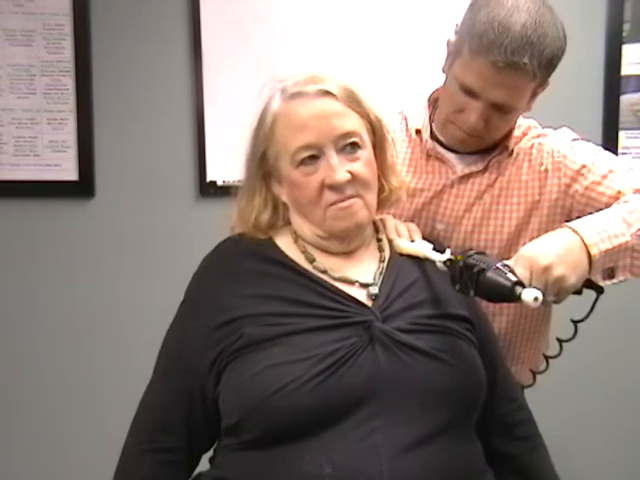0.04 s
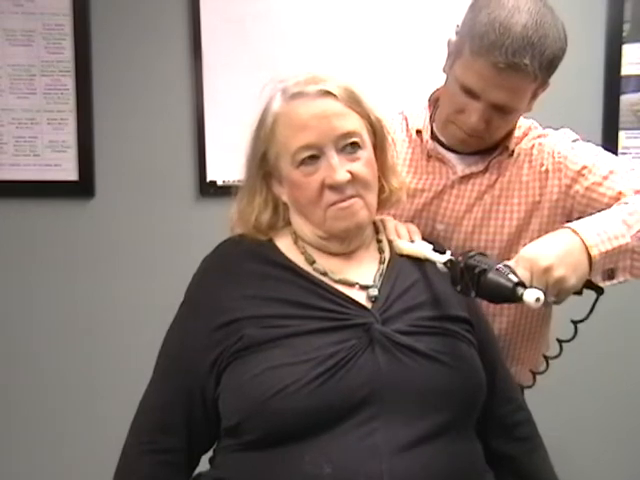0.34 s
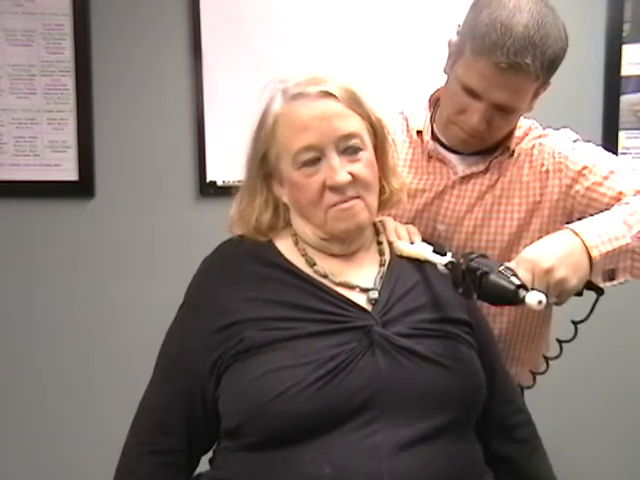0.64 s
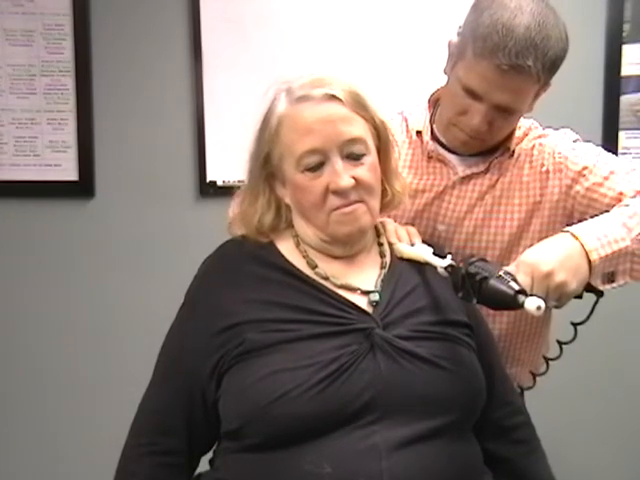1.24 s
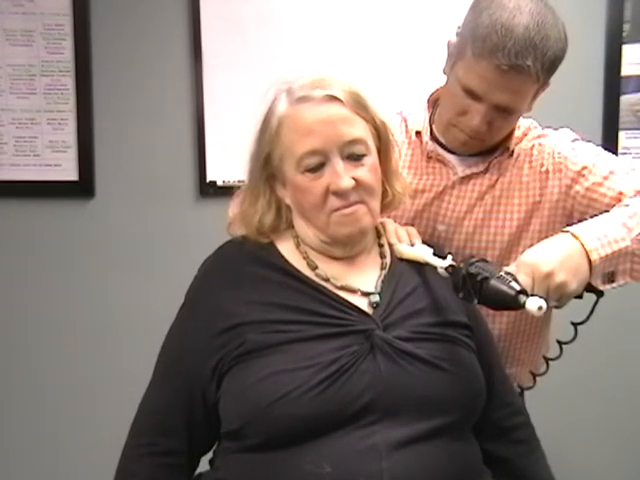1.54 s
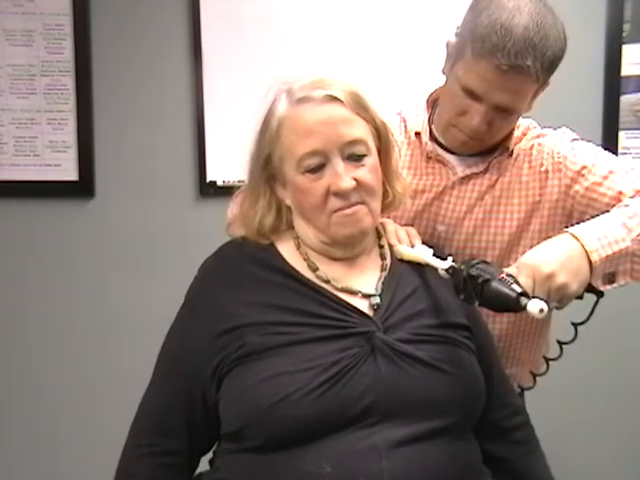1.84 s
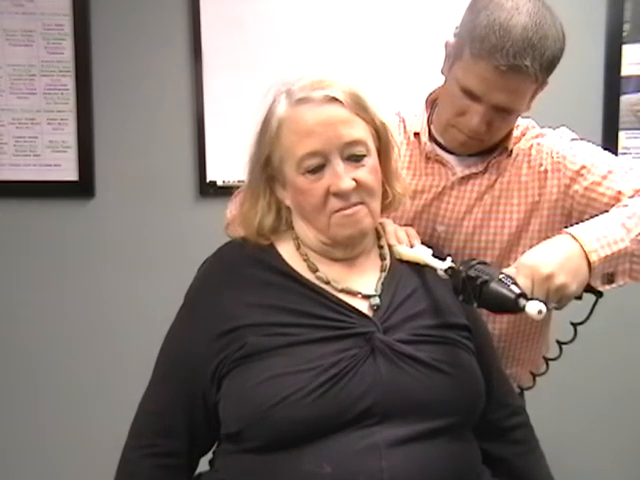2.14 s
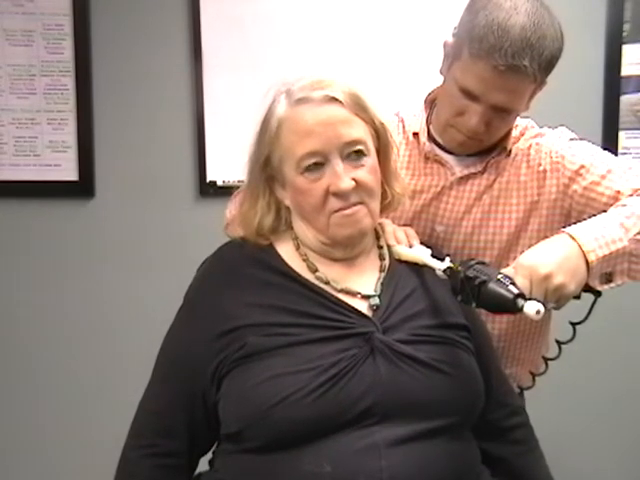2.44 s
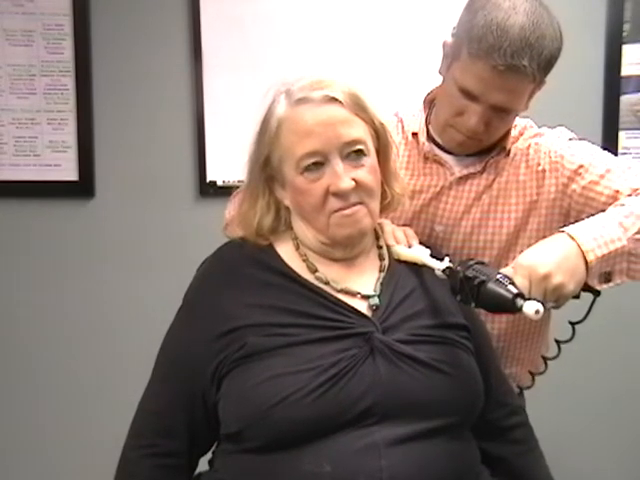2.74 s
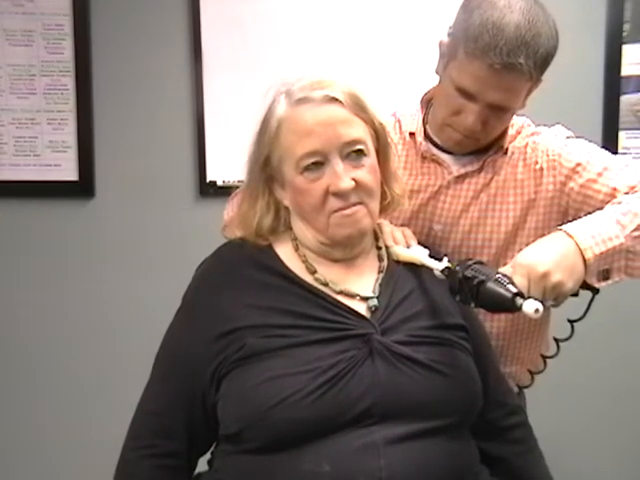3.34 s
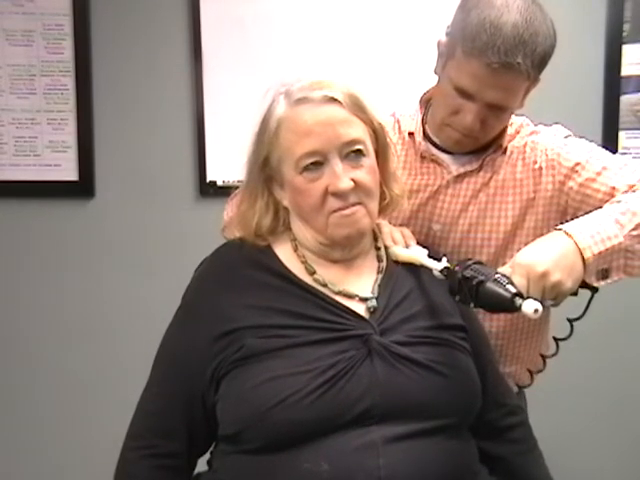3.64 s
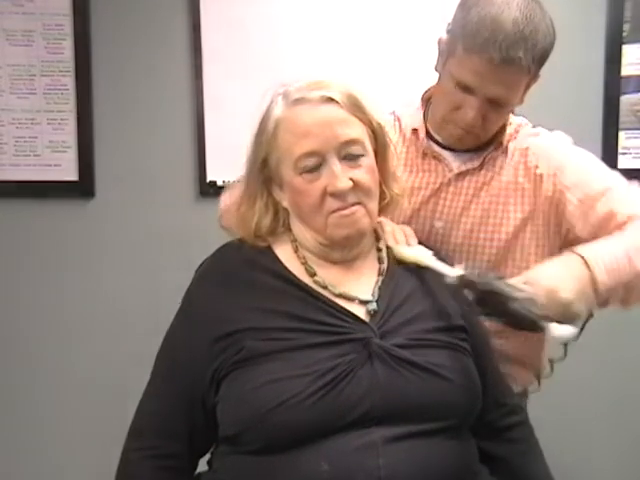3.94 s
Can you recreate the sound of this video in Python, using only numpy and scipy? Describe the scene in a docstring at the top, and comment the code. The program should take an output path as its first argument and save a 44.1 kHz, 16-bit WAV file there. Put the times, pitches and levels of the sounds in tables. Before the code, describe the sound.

A handheld adjusting tool taps rapidly against a shoulder, then stops in a quiet office.

```python
"""Rapid tapping, twelve blows a second: a handheld spring-tipped adjusting tool on a shoulder.
In each stroke the plunger slides, catches with a tick and strikes: a bright snap, a hollow knock of
the housing, a soft thud in the shoulder and a ping. The blows grow firmer; a small office answers
each one, over low ventilation hum. A heavier knock ends the run; cloth rustles as the tool lifts."""
import sys
import numpy as np
from scipy import signal
from scipy.fft import rfft, irfft
from scipy.io import wavfile

SR = 44100
rng = np.random.default_rng(int(sys.argv[2]) if len(sys.argv) > 2 else 0)


def waveform_to_disk(signal):
    """Save audio, clipped to [-1, 1], as 16-bit WAV at the path in sys.argv[1]."""
    frames = np.transpose(np.atleast_2d(signal))
    scaled = np.clip(frames, -1, 1) * 32767
    samples = np.round(scaled).astype(np.int16)
    wavfile.write(sys.argv[1], SR, samples)


N = 176400

FIRST_S, PERIOD_S, STROKES = -.01875, .083289, 45
KNOCK_WET_DB = -1


def amp(db):
    """Decibels to gain."""
    return 10 ** (np.asarray(db) / 20)


def unit(x):
    """Scales to unit energy."""
    return x / np.sqrt(np.sum(x ** 2) + 1e-20)


def read(points, hz):
    """Interpolates a table on a log-frequency axis."""
    f, value = np.transpose(points)
    return np.interp(np.log(hz + 1), np.log(f), value)


def add(mix, start_s, sound):
    """Adds a sound into a track, cropped to fit."""
    at = int(round(start_s * SR))
    sound = sound[max(-at, 0):]
    part = mix[max(at, 0):][:len(sound)]
    part += sound[:len(part)]


def shaped(x, spectrum):
    """Zero-phase filter with the given spectrum."""
    return irfft(rfft(x) * amp(read(spectrum, np.fft.rfftfreq(len(x), 1 / SR))), len(x))


def even(x):
    """Flattens a noise's spectrum; unit energy."""
    z = rfft(x)
    return unit(irfft(z / (abs(z) + 1e-12), len(x)))


def colour(spectrum, size=4096):
    """Minimum-phase impulse response of a spectrum; unit energy."""
    log_gain = np.log(amp(read(spectrum, abs(np.fft.fftfreq(size, 1 / SR)))))
    response = np.exp(np.conj(signal.hilbert(log_gain)))
    return unit(np.fft.ifft(response).real[:size // 2])


def stereo(mid, side):
    """Left and right from mid and side."""
    return np.array([mid + side, mid - side])


def early(echo_db=0):
    """Direct sound plus reflections from the near walls."""
    # Each row: delay in ms, relative gain.
    echoes = [(5.19, .4), (10.77, .5), (14.46, .42), (21.96, .2), (23.79, .28), (29.18, .38), (41.75, .26)]
    mid = np.zeros(SR // 2)
    mid[0] = 1
    for delay_ms, gain in echoes:
        add(mid, delay_ms / 1000, [gain * amp(echo_db)])
    return np.array([mid, mid])


def tail(size=256, build_ms=.17):
    """Reverberation: even noise, each band dying at its own rate."""
    # Each row: frequency in Hz, T60 in seconds.
    room = [(150, 0.6), (500, 0.42), (1000, 0.32), (2000, 0.35), (5000, 0.33), (9000, 0.22), (15000, 0.24)]
    t = np.arange(SR // 2) / SR
    fade = np.exp(-np.log(1000) * t / np.mean(room, 0)[1])
    noise = rng.standard_normal(len(t))
    for _ in range(3):
        noise = np.sign(even(noise * fade))
    hz, frame_s, bands = signal.stft(noise, SR, nperseg=size)
    bands *= np.exp(-np.log(1000) * frame_s / read(room, hz)[:, None])
    decay = signal.istft(bands, SR, nperseg=size)[1][:len(t)]
    return unit(decay * (1 - np.exp(-t * 1000 / build_ms)))


def diffuse(wet_db):
    """The room's tail in stereo."""
    # Each row: frequency in Hz, side gain in dB.
    width = [(100, -2.5), (700, -11.5), (2000, -7.5), (4500, -13.5), (8000, -7), (14000, 2)]
    return amp(wet_db) * stereo(tail(), shaped(tail(), width))


def blows(layer):
    """Time in seconds and gain of every stroke for one layer."""
    # Each row: time in seconds, then gain in dB of thud, knock, snap, top treble.
    force = [(.06, -6.5, -4.5, -3, -5), (.45, -5.5, -4.5, -2.5, -3), (.75, -6.5, -4, -4, -8),
             (1.05, -7, -4, -4, -8), (1.3, -5.5, -4, -2.5, -5), (2.2, -1.5, -2.5, -3, -0.5),
             (2.5, -1, -1.5, -3.5, 2), (3.1, 1.5, -1.3, -3, 5), (3.56, 1, 0, -3.3, 4.5),
             (3.64, -1, -1.7, -2.5, 2)]
    at_s, *gains_db = np.transpose(force)
    layer_db = gains_db[("thud", "knock", "snap", "top").index(layer)]
    times_s = FIRST_S + PERIOD_S * np.arange(STROKES)
    return zip(times_s, amp(np.interp(times_s, at_s, layer_db)))


def repeat(sound, layer):
    """Plays one stereo sound at every stroke."""
    out = np.zeros((2, N))
    for strike_s, gain in blows(layer):
        for track, channel in zip(out, sound):
            add(track, strike_s, gain * channel)
    return out


def plunger(layer, size=512, alike=.69, scatter_ms=.04, scatter_db=1.8, click_db=-8, side_db=-30.5):
    """The plunger slides, catches and strikes: each contact a click and a rattle, varying by stroke."""
    # Each row: lead before the strike in ms, relative level in dB, decay in ms.
    contacts = [(4, -16.5, 0.5), (2.8, -6.5, 3.6), (1.6, -3.5, 0.79), (0.054, -3, 0.62)]
    t_ms = np.arange(size) / SR * 1000
    out = np.zeros((2, N))
    grains = rng.standard_normal((len(contacts), size))
    for strike_s, gain in blows(layer):
        for (lead_ms, db, decay_ms), usual in zip(contacts, grains):
            fresh, side = rng.standard_normal((2, size))
            fade = np.exp(-t_ms / decay_ms)
            noise = alike * usual + np.sqrt(1 - alike ** 2) * fresh
            rattle = unit(even(noise * fade) * np.sqrt(fade))
            mid = unit(rattle + amp(click_db) * (t_ms == 0))
            late, loud = rng.standard_normal(2)
            start_s = strike_s + (scatter_ms * late - lead_ms) / 1000
            for track, burst in zip(out, stereo(mid, amp(side_db) * unit(side * fade))):
                add(track, start_s, gain * amp(db + scatter_db * loud) * burst)
    return out


def metal(spectrum, layer, wet_db, pan_db, count=4, alike=.841):
    """Plunger contacts in the room, filtered; the tail is a blend that drifts from stroke to stroke."""
    out = signal.oaconvolve(plunger(layer), early(echo_db=-11.5), axes=1)[:, :N]
    tails = [diffuse(wet_db) for _ in range(count)]
    blend = unit(rng.standard_normal(count))
    for strike_s, gain in blows(layer):
        blend = unit(alike * blend + np.sqrt(1 - alike ** 2) * unit(rng.standard_normal(count)))
        for track, channel in zip(out, np.tensordot(blend, tails, 1)):
            add(track, strike_s, gain * channel)
    return signal.oaconvolve(out, colour(spectrum)[None], axes=1)[:, :N] * amp([[pan_db], [-pan_db]])


def snap():
    """Metal on metal: a bright snap, plus top treble that follows its own level curve."""
    # Each row, both tables: frequency in Hz, relative level in dB.
    snap_spectrum = [(300, -32), (900, -16), (2100, 3), (3100, -13), (4150, -7.5), (4550, -4), (5450, -5),
                     (5950, -0.5), (7200, -8.5), (8500, 3), (9900, 2), (11000, -9.5), (12500, -19.5),
                     (16000, -22)]
    top_spectrum = [(5800, -42.5), (6800, -5), (7600, -1.5), (10000, -6.5), (11500, -5), (13000, -4.5),
                    (14500, -11), (15700, -17), (16500, -26)]
    bright = amp(-14.5) * metal(snap_spectrum, "snap", wet_db=-.8, pan_db=-.27)
    return bright + amp(-21.5) * metal(top_spectrum, "top", wet_db=-4, pan_db=1)


def body(spectrum, wet_db, echo_db=0):
    """One blow into a damped body, heard in the room."""
    return signal.fftconvolve(early(echo_db) + diffuse(wet_db), colour(spectrum)[None], axes=1)


def knock():
    """Each strike knocks the hollow housing."""
    # Each row: frequency in Hz, relative level in dB.
    spectrum = [(250, -27.5), (520, -18), (640, -7.5), (780, -3), (1000, 3), (1130, -2.5), (1220, -13),
                (1310, -3), (1400, -12.5), (1580, -24.5), (1720, -3), (1950, -0.5), (2150, -8),
                (2330, -10.5), (2550, -27), (3300, -17.5), (6000, -60)]
    return amp(-19.3) * repeat(body(spectrum, KNOCK_WET_DB), "knock")


def thud():
    """The shoulder takes each blow with a soft thud."""
    # Each row: frequency in Hz, relative level in dB.
    spectrum = [(40, -12.5), (90, -21), (185, 5), (260, -27), (340, 12), (440, -5), (600, -0.5),
                (1200, -48.5)]
    return amp(-27.5) * repeat(body(spectrum, wet_db=-5, echo_db=-6), "thud")


def ping():
    """The struck tool rings: a hollow tone, a close metallic cluster, faint high partials."""
    # Each row: frequency in Hz, level in dB before the stroke's gain, T60 in seconds.
    modes = [(774, -50.5, 0.29), (766, -49, 0.086), (1933, -46, 0.072), (1980, -47, 0.21),
             (2036, -53, 0.22), (6150, -53, 0.046), (9510, -68, 0.089)]
    t = np.arange(SR // 2) / SR
    tone = sum(amp(db) * np.exp(-np.log(1000) * t / t60_s) * np.sin(2 * np.pi * hz * t)
               for hz, db, t60_s in modes)
    return repeat([tone, tone], "knock")


def room_ring(t60_s=.18, build_ms=5, side_db=-14.5, split_hz=500):
    """Room modes ring between blows; the low ones follow the thud, the rest the knock."""
    # Each row: frequency in Hz, relative level in dB.
    modes = [(187, -17), (345, -6), (370, -1), (625, -5), (684, -2), (721, -2), (803, -3), (855, 1),
             (956, -2), (984, 0), (1006, -2), (1087, -4), (1164, -5), (1292, -6), (1700, -2), (1842, -1),
             (1936, -2), (2130, -3)]
    t = np.arange(SR // 2) / SR
    rings = np.zeros((2, 2, len(t)))
    for hz, db in modes:
        mid, side = np.sin(2 * np.pi * (hz * t + rng.random((2, 1))))
        fade = amp(db) * np.exp(-np.log(1000) * t / t60_s)
        rings[int(hz > split_hz)] += fade * stereo(mid, amp(side_db) * side)
    low, high = np.sqrt(2) * unit(rings * (1 - np.exp(-t * 1000 / build_ms)))
    return amp(-20.5) * (repeat(low, "thud") + repeat(high, "knock"))


def ventilation():
    """Low rush of air with faint mains hum, both slowly swelling."""
    # Each row: frequency in Hz, relative spectral density in dB.
    spectrum = [(40, -32.5), (60, -26), (80, -15), (98, 0), (125, -11.5), (200, -1), (290, -14),
                (420, -12.5), (600, -17), (950, -24), (2000, -28.5), (4000, -31.5), (9000, -26.5),
                (16000, -43)]
    # Each row: frequency in Hz, side gain in dB.
    width = [(100, -5), (600, -8.5), (3000, -4)]
    # Each row: frequency in Hz, RMS level in dB before the swell.
    mains = [(59.5, -82), (118.6, -77)]
    # Each row: time in seconds, gain in dB.
    swell = [(0, -5), (1.2, -4), (2.5, -0.5), (4, 2)]
    t = np.arange(N) / SR
    mid, side = (unit(shaped(rng.standard_normal(N), spectrum)) * np.sqrt(N) for _ in range(2))
    air = amp(-72) * stereo(mid, shaped(side, width))
    hum = sum(amp(db) * np.sqrt(2) * np.sin(2 * np.pi * (hz * t + rng.random())) for hz, db in mains)
    return (air + hum) * amp(np.interp(t, *np.transpose(swell)))


def landing(start_s=3.6475):
    """The plunger comes to rest with one heavier, duller knock."""
    # Each row: frequency in Hz, relative level in dB.
    spectrum = [(450, -38), (680, -9), (800, 3.5), (1050, 2.5), (1350, -12.5), (1700, -19), (6000, -47)]
    out = np.zeros((2, N))
    for track, channel in zip(out, body(spectrum, KNOCK_WET_DB)):
        add(track, start_s, amp(-19.5) * channel)
    return out


def rustle(peak_s=3.965, width_s=.043, grains_per_s=2100):
    """Cloth rubs faintly as the tool lifts away: a swell of tiny uneven grains."""
    # Each row: frequency in Hz, relative spectral density in dB.
    spectrum = [(400, -15), (1000, 9), (2000, 3), (8800, -15), (13000, -28)]
    t = np.arange(N) / SR
    grains = rng.standard_normal(N) * (rng.random(N) < grains_per_s / SR)
    swell = np.exp(-((t - peak_s) / width_s) ** 2)
    rub = amp(-76) * np.sqrt(N) * unit(shaped(grains, spectrum)) * swell
    return rub + signal.oaconvolve(rub[None], diffuse(KNOCK_WET_DB), axes=1)[:, :N]


def scene():
    """The tapping tool in the quiet office."""
    strokes = thud() + knock() + room_ring() + snap() + ping()
    return strokes + landing() + ventilation() + rustle()


def record(dry):
    """Cuts the deepest bass and the highest treble."""
    low_cut_hz, high_cut_hz = 57, 16100
    highpass = signal.butter(6, low_cut_hz, "high", fs=SR, output="sos")
    lowpass = signal.firwin(255, high_cut_hz, window=("kaiser", 9), fs=SR)
    return signal.oaconvolve(signal.sosfilt(highpass, dry), lowpass[None], "same")


dry = scene()
out = record(dry)
waveform_to_disk(out)
```